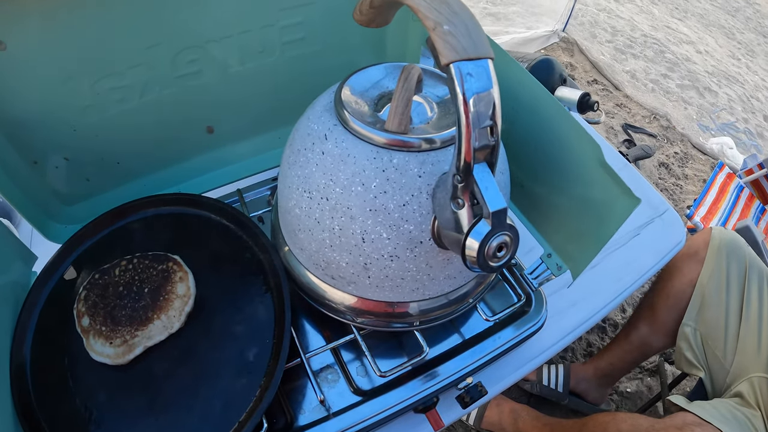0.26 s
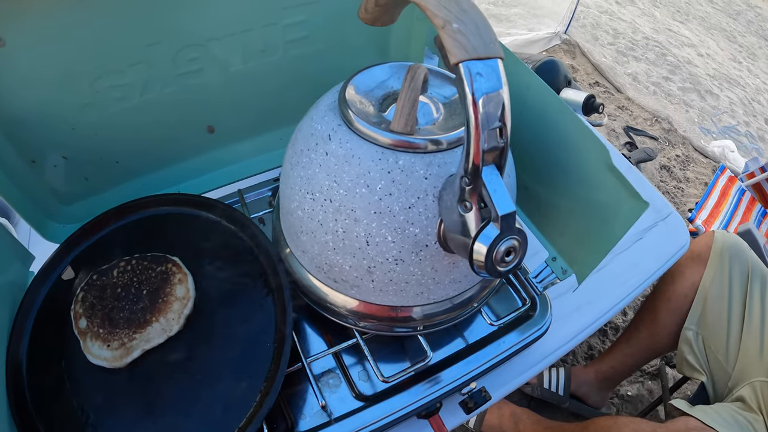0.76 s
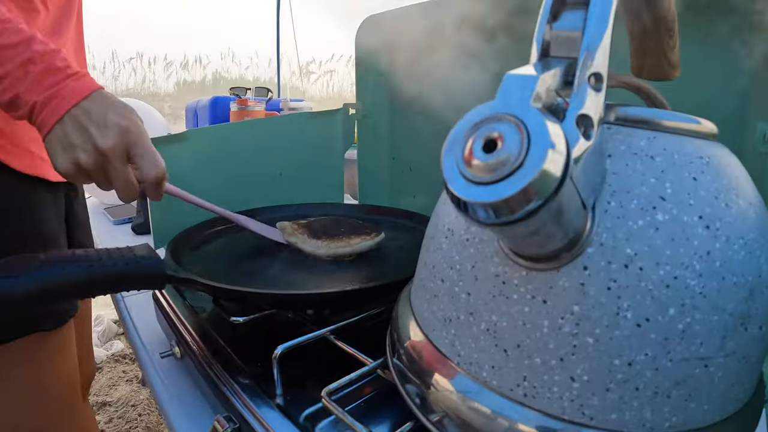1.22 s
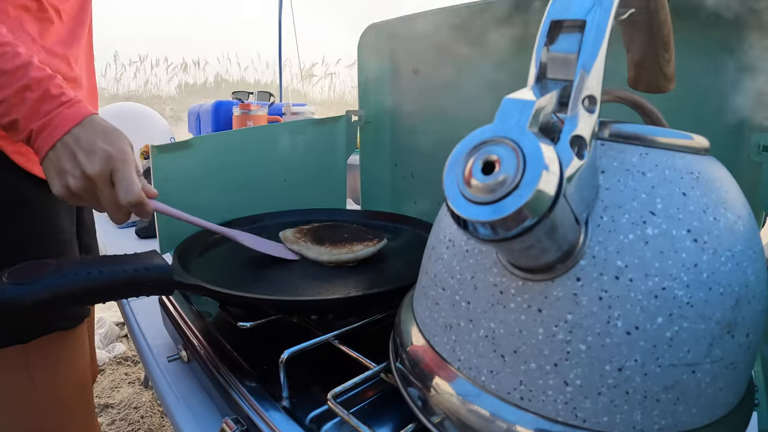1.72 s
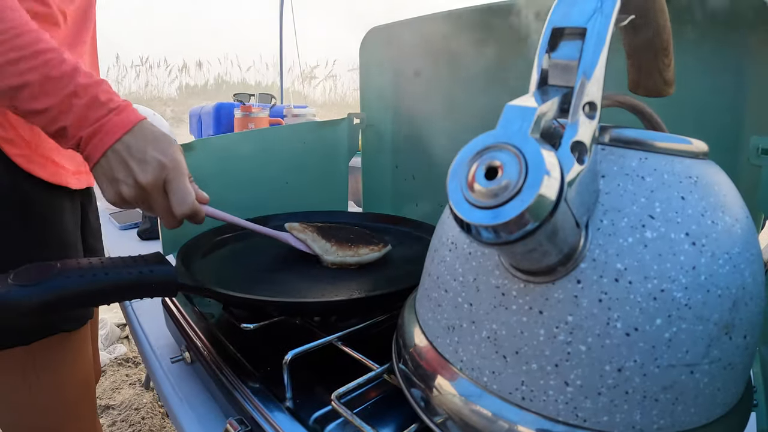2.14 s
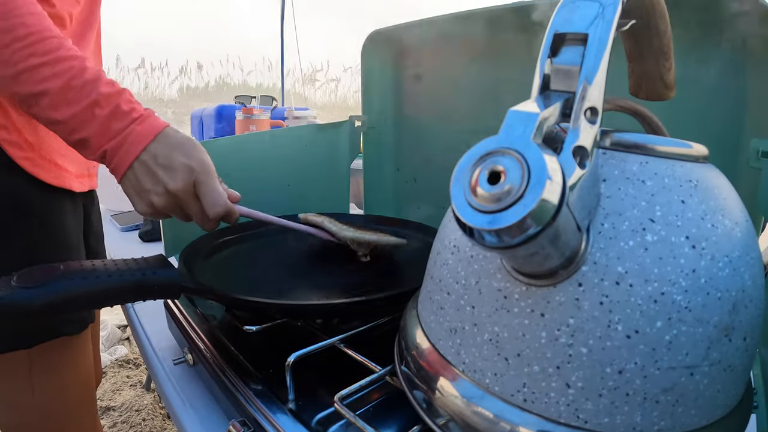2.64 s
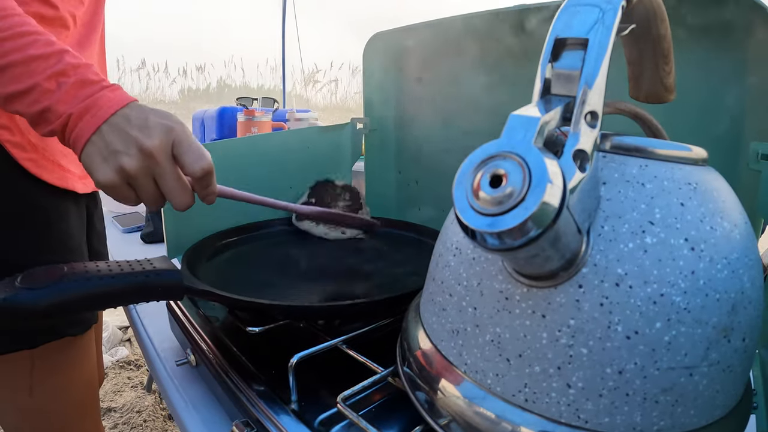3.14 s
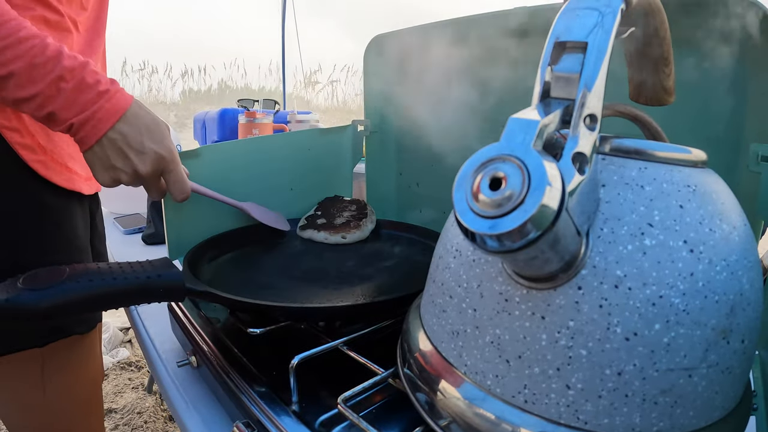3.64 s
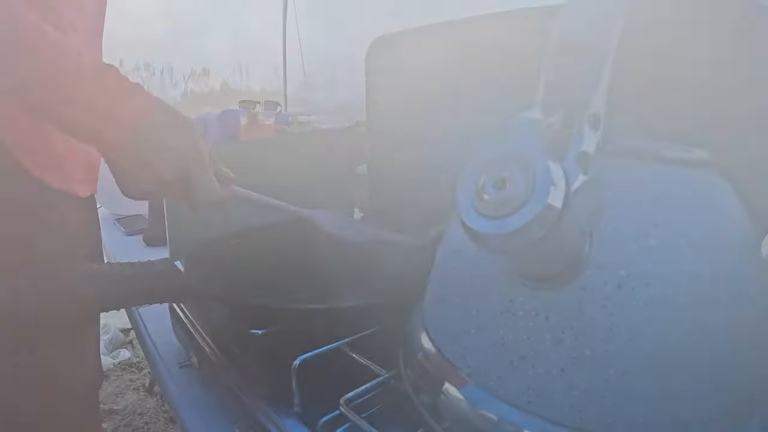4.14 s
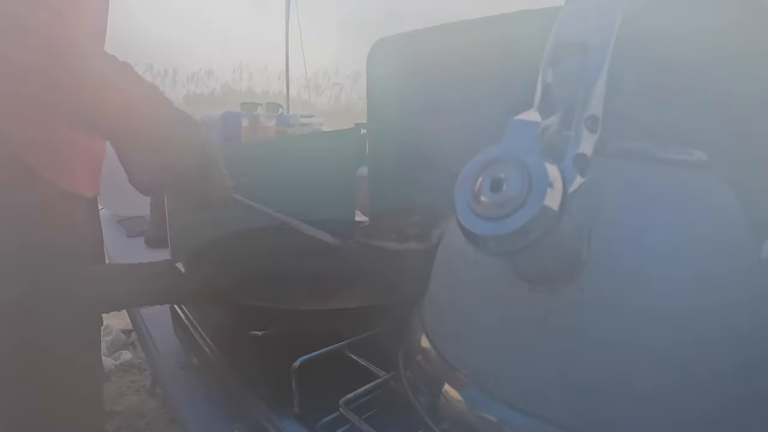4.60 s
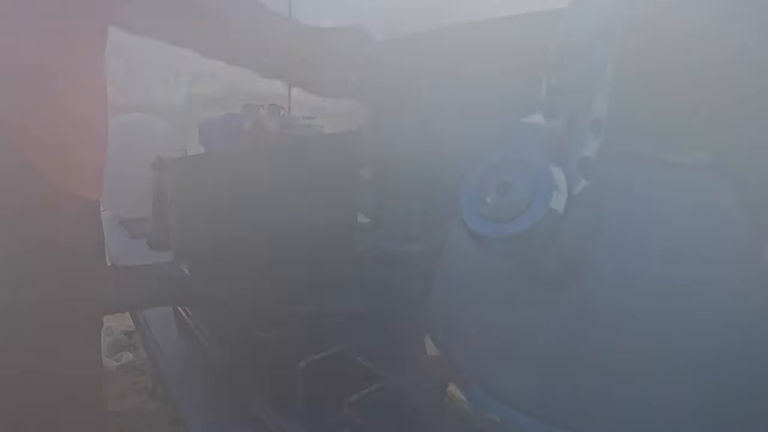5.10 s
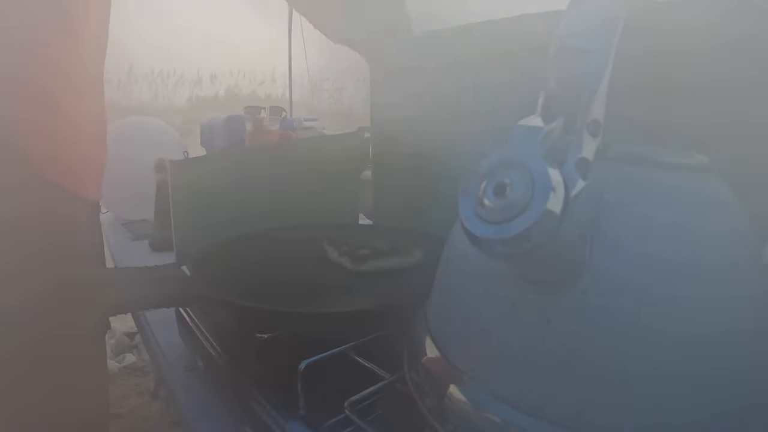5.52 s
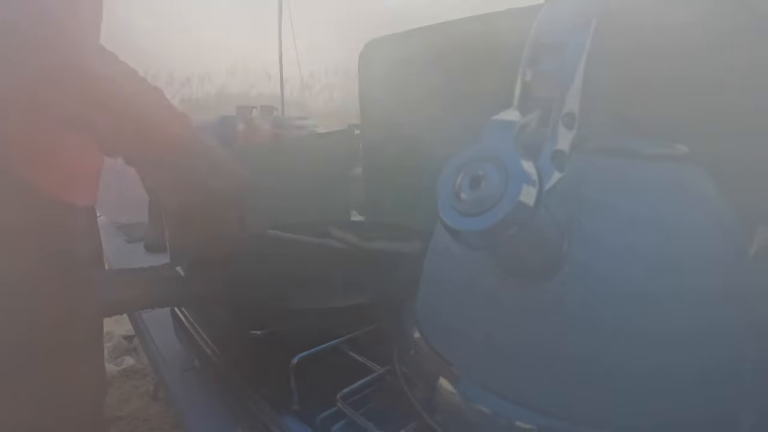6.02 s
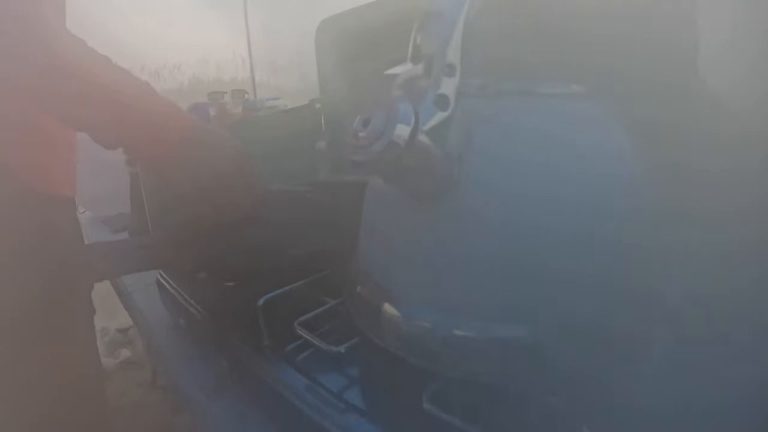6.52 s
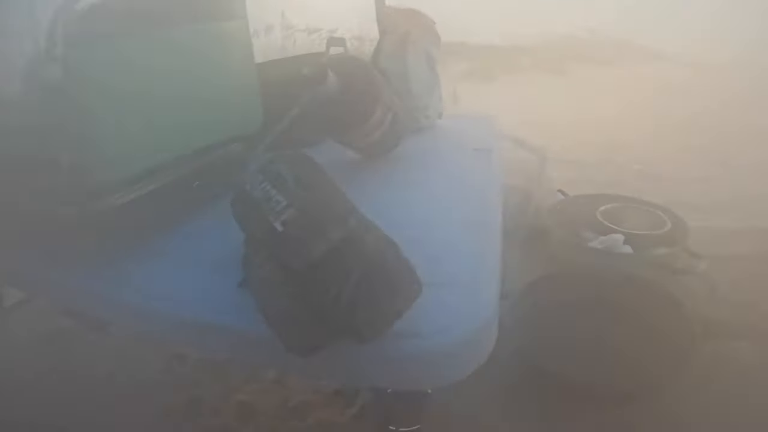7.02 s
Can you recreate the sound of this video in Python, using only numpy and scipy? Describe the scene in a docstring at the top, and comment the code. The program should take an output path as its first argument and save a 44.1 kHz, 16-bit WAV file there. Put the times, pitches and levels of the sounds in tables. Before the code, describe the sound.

Close outdoors at a gas camp stove, steam blows through a kettle spout with a husky, sputtering hollow note over a low roar and soft breeze. After a tiny silence a very shrill whistle cuts in, breaks down to a lower, fuller pitch, and climbs shakily with hissing steam. At the end the hiss fades, the roar rises and the whistle slides left.

```python
"""Kettle whistling on a camp stove

A kettle boils on a gas camp stove outdoors, heard from close by. At first steam only blows through the spout:
noise shaped by air resonances, over the rumble of burner and water and a light breeze. Then, after a short
silent gap, the scene changes: the cap whistles, built from jittering sine partials with echoes and steam hiss:
a shrill mode first, then a lower one with overtones that climbs as the steam builds. Near the end the hiss
fades, the roar rises and the whistle moves to the left."""
import sys
import numpy as np
from scipy import signal
from scipy.fft import rfft, irfft
from scipy.io import wavfile
from scipy.ndimage import uniform_filter1d

SR = 44100
rng = np.random.default_rng(int(sys.argv[2]) if len(sys.argv) > 2 else 0)


def master_out(mix):
    """Clip the mix to full scale and print it as 16-bit PCM to the path in sys.argv[1]."""
    frames = np.transpose(np.atleast_2d(mix))
    ceiling = np.clip(frames, -1, 1)
    pcm = np.round(ceiling * 32767).astype(np.int16)
    wavfile.write(sys.argv[1], SR, pcm)


N = 319794
T = np.arange(N) / SR  # time of every sample in seconds
FREQS = np.fft.rfftfreq(N, 1 / SR)

MODE_JUMP_S = 1.784  # the whistle jumps from the shrill mode to the main one
# from this moment the steam fades and the roar rises
LATE_S, LATE_HISS_FADE_DB_PER_S, LATE_HOLLOW_FADE_DB_PER_S, LATE_ROAR_RISE_DB_PER_S = 6.73, 14.5, 13, 4.5


def amp(db):
    """Decibels to gain."""
    return 10 ** (np.asarray(db) / 20)


def curves(rows):
    """Each column of a table, joined by straight lines in time."""
    seconds, *columns = np.transpose(rows)
    return [np.interp(T, seconds, column) for column in columns]


def ramp(start, length):
    """Rises from 0 to 1, both times in seconds."""
    return np.clip((T - start) / length, 0, 1)


def since(start):
    """Seconds gone by after a moment, zero before it."""
    return np.maximum(T - start, 0)


def swells(rows):
    """Sum of smooth bumps, one for each row of time, half length and height."""
    return sum(height * np.exp(-((T - s) / half) ** 2) for s, half, height in rows)


def colour(points):
    """Gain at every frequency from a short spectrum."""
    hz, db = np.transpose(points)
    return amp(np.interp(np.log(FREQS + 1), np.log(hz), db))


def resonances(modes, skirt=1.5):
    """Gain at every frequency from a few air resonances; a larger skirt falls off faster at the sides."""
    power = 0
    for hz, width, db in modes:
        distance = (FREQS - hz) / (0.49 * width)
        power = power + amp(db) ** 2 / (1 + distance ** 2) ** skirt
    return np.sqrt(power)


def noise(gain, band=(0, SR)):
    """Coloured noise with rms 1 inside a band in Hz."""
    inside = (FREQS >= band[0]) & (FREQS <= band[1])
    coloured = irfft(rfft(rng.standard_normal(N)) * gain, N)
    return coloured / np.sqrt(np.mean(gain ** 2 * inside))


def wander(slow_hz, fast_hz, slope=0.9):
    """Random drift of rms 1, mostly between a slow and a fast rate."""
    above_slow = FREQS / (FREQS + slow_hz)
    below_fast = 1 / (1 + (FREQS / fast_hz) ** 4)
    return noise((FREQS + slow_hz) ** -slope * above_slow * below_fast)


def wide(gain, side_db, band=(0, SR)):
    """Stereo noise: a part shared by both sides plus a part of opposite sign at side_db."""
    shared = noise(gain, band)
    return shared + np.array([[1], [-1]]) * amp(side_db) * noise(gain, band)


def panned(z, db, lead=0):
    """Places a sound by its left-minus-right level and, if complex, the right side's phase lead in radians."""
    left_right = np.array([[.5], [-.5]])
    sides = amp(left_right * db)
    return (z * sides / sides.mean(0) * np.exp(-1j * left_right * lead)).real


def steady(z):
    """Evens out the level of a complex tone over about 54 ms."""
    return z / np.sqrt(uniform_filter1d(abs(z) ** 2, size=2400) + 1e-12)


def partial(hz, db, scatter_db, decay=0.0073):
    """One complex partial plus echoes off the stove's wind shields, which turn pitch jitter into flutter."""
    tone = np.exp(2j * np.pi * np.cumsum(hz) / SR)
    t = T[:SR // 20]
    # a dense random burst of echoes that builds up, then dies away (decay in seconds)
    taps = rng.standard_normal(len(t)) * np.exp(-t / decay) * (1 - np.exp(-(t / decay) ** 2))
    echoes = signal.oaconvolve(tone, taps)[:N]
    # the flutter is deepest where the direct sound is weak
    echo_share = np.minimum(amp(scatter_db - db), 1)
    heard = steady(tone + echo_share * steady(echoes))
    return np.sqrt(2) * amp(db) * heard


# Colours of the roar, the breeze and the thin high hiss.
# Each row: frequency in Hz, relative level in dB per Hz.
ROAR_COLOUR = [(15, -25), (40, -8), (80, -0.5), (130, -1), (165, -3.5), (210, -4), (300, -8.5), (400, -13),
               (520, -21), (750, -30), (1200, -33), (3000, -62.5)]
BREEZE_COLOUR = [(5, -9), (20, -2.5), (45, 1), (80, 0.5), (130, -6.5), (300, -36.5), (1000, -84)]
AIR_COLOUR = [(9000, -24), (11200, -17.5), (12000, 4.5), (12700, -10), (15000, -16.5)]
# Gusts of the breeze. Each row: time in seconds, half length in seconds, lift in dB.
GUSTS = [(.3, 0.52, 8), (1.42, 0.25, 9), (3.3, .2, 2), (3.85, 0.13, 3.5), (4.32, 0.047, 8),
         (5.23, .085, 12), (6.15, .15, 6), (7.15, 0.22, 3)]
# the roar is loud at first and settles as the whistle takes over
ROAR_DB, SETTLED_ROAR_DB, SETTLE_START_S, SETTLE_LENGTH_S = -31, -42.5, 0.87, 1.24
BREEZE_DB, AIR_DB, AIR_RISE_DB = -42.3, -69.5, 5.5


def stove():
    """Low roar of flame and rolling water, a thin high hiss and a light breeze, all coloured noise."""
    roar_db = ROAR_DB + (SETTLED_ROAR_DB - ROAR_DB) * ramp(SETTLE_START_S, SETTLE_LENGTH_S)
    roar_db = roar_db + LATE_ROAR_RISE_DB_PER_S * since(LATE_S)
    roar = amp(roar_db) * wide(colour(ROAR_COLOUR), side_db=-31.5, band=(130, 450))
    breeze = amp(BREEZE_DB + swells(GUSTS)) * wide(colour(BREEZE_COLOUR), side_db=-29)
    air_db = AIR_DB + AIR_RISE_DB * ramp(2.7, 0.9)
    air = amp(air_db) * wide(colour(AIR_COLOUR), side_db=4)
    return roar + breeze + panned(air, db=-1.5)


# Air resonances of kettle and spout while steam only blows.
# Each row: frequency in Hz, width scale in Hz, relative level in dB.
BLOW_MODES = [(1213, 39.6, -0.5), (1337, 140, -15.5), (1755, 156, -20), (3427, 117, -20), (4880, 77, -32),
              (5700, 140, -34), (7020, 160, -44)]
# Colour of the blowing hiss. Each row: frequency in Hz, relative level in dB per Hz.
BLOW_COLOUR = [(300, -28), (800, -12), (1400, 5.5), (2300, -8), (3000, -4.5), (4400, 4), (5500, -6.5),
               (7500, -9), (8300, -16), (9900, -15.5), (11400, -31), (12000, -24), (12700, -30),
               (15000, -47)]
BLOW_DB, BLOW_HISS_DB = -26, -43


def blowing():
    """Too weak to whistle yet, steam rings the spout with a husky, sputtering note."""
    note_db = BLOW_DB + 1.2 * (ramp(0, 0.63) - 0.5)  # swells slightly at the start
    note = amp(note_db) * noise(resonances(BLOW_MODES, skirt=1.36))
    hiss = amp(BLOW_HISS_DB) * wide(colour(BLOW_COLOUR), side_db=-9)
    sputter_db = 1.3 * wander(slow_hz=12, fast_hz=90, slope=.5)
    placed = panned(signal.hilbert(note), db=1.0, lead=0.66)
    return (placed + hiss) * amp(sputter_db)


# Colours of the jet: under the shrill mode, then early and late under the main mode.
# Each row: frequency in Hz, relative level in dB per Hz.
SHRILL_JET_COLOUR = [(300, -14), (700, 12), (1500, 7), (2000, 17.5), (2350, 15.5), (2750, 5), (3600, 17),
                     (4300, 28.5), (5200, 8), (6300, 9), (6900, -1), (8200, 17), (9000, -18), (15000, -41)]
EARLY_JET_COLOUR = [(300, -24), (700, -8), (1500, -7.5), (2500, 2), (3950, -4), (4400, 7.5), (5200, 7.5),
                    (6050, -10.5), (6600, -2), (7400, -1), (8500, -8.5), (10300, -13.5), (11300, -35),
                    (12400, -20), (15300, -36)]
LATE_JET_COLOUR = [(300, -19.5), (700, -10.5), (1500, -8), (2100, -5.5), (2500, 4.5), (3950, -3.5),
                   (4600, 4), (5400, 8.5), (6500, -0.5), (8300, -7.5), (10300, -13), (11100, -24.5),
                   (12100, -20), (15300, -34.5)]
# Kettle resonances that lift bands of the hiss. Each row: frequency in Hz, width scale in Hz, lift in dB.
HISS_BANDS = [(2345, 220, 2), (3376, 260, 5.5), (4510, 150, 3), (4900, 140, 3.5), (7160, 260, 4),
              (7800, 200, 5.5), (9500, 320, 1), (10200, 250, 2.5)]
# Air resonances of the spout. Each row: frequency in Hz, width scale in Hz, relative level in dB.
SPOUT_MODES = [(1237, 37, 1.5), (1320, 138, -11.5), (1825, 133, -14.5)]
# Drift of the whistle between the ears; the hiss follows part of it.
# Each row: time in seconds, first partial's left-minus-right level in dB, the same for the second partial
# in dB, phase lead of the right side in radians.
PAN = [(3.6, 0, 0, 0), (3.7, 0, 1, 0.053), (4.45, -.6, 3.5, 0.28), (4.65, -0.5, -8, 0.4),
       (5.3, -1.7, -13, 0.42), (5.55, -2, -5.5, 0.56), (6.2, -2.5, -3, 0.47), (6.7, -2, -0.5, 0.58),
       (7.0, 5.5, 4, 0.23), (7.25, 11, 9, -0.27)]
# hiss of the jet and hollow note of the spout, under the shrill mode and at the start of the main one
SHRILL_HISS_DB, HISS_DB, SHRILL_HOLLOW_DB, HOLLOW_DB = -56.5, -44, -33.5, -40
HISS_FADE_DB_PER_S = 0.29


def steam():
    """The jet hisses and sounds the hollow of the spout, all of it sputtering together."""
    band = (6300, 7200)  # Hz, where the hiss levels apply
    lift_db = 0
    for hz, width, db in HISS_BANDS:
        lift_db = lift_db + db * np.exp(-((FREQS - hz) / (0.48 * width)) ** 2)
    lift = amp(lift_db)
    jumped = ramp(MODE_JUMP_S - .002, 0.0062)
    full = ramp(3.7, 1.0)  # the hiss broadens at full boil

    hiss_db = SHRILL_HISS_DB + (HISS_DB - SHRILL_HISS_DB) * jumped
    hiss_db = hiss_db - HISS_FADE_DB_PER_S * since(MODE_JUMP_S)
    hiss_db = hiss_db - LATE_HISS_FADE_DB_PER_S * since(LATE_S)
    hollow_db = SHRILL_HOLLOW_DB + (HOLLOW_DB - SHRILL_HOLLOW_DB) * ramp(1.57, 0.25)
    hollow_db = hollow_db - LATE_HOLLOW_FADE_DB_PER_S * since(LATE_S)

    # equal-power crossfades between the three colours
    jet = np.sqrt(1 - jumped) * noise(colour(SHRILL_JET_COLOUR), band)
    jet = jet + np.sqrt(jumped * (1 - full)) * noise(lift * colour(EARLY_JET_COLOUR), band)
    jet = jet + np.sqrt(full) * wide(lift * colour(LATE_JET_COLOUR), side_db=-25, band=band)
    jet = panned(jet, 0.78 * curves(PAN)[0])
    hollow = noise(resonances(SPOUT_MODES))
    sputter_db = 0.99 * wander(slow_hz=5.5, fast_hz=120, slope=1.0)
    return (jet * amp(hiss_db) + hollow * amp(hollow_db)) * amp(sputter_db)


# Surges and lulls of steam pressure bend whichever mode is sounding.
# Each row: time in seconds, half length in seconds, pitch change in Hz.
SURGES = [(1.218, .012, 104), (1.345, 0.021, -44), (1.377, 0.0088, 86), (1.567, .014, -59.5),
          (1.655, 0.027, -35.5), (1.745, 0.048, 59.5), (1.825, .02, 38), (1.881, 0.01806, -47.5),
          (2.072, 0.01214, 44.5), (2.705, .069, 40.5), (3.17, 0.071, 42.5), (3.373, 0.082, -110),
          (4.1, .015, 40), (4.224, 0.093, -100), (4.366, .072, -71), (4.674, .1, 42), (4.88, 0.024, -30),
          (5.567, 0.022, 49), (5.708, .029, -64), (6.25, .11, 60.5), (6.57, 0.051, -40.5),
          (6.78, .17, -95.5), (7.132, 0.14, 66)]
# The fundamental of either mode drops away for an instant.
# Each row: time in seconds, half length in seconds, level change in dB.
DIPS = [(1.725, 0.0042, -6), (2.655, .016, -5), (2.73, 0.018, -5), (3.27, .04, -2.5), (3.52, 0.068, -3.5),
        (4.24, 0.023, -6.5), (5.71, .025, -2), (6.95, .03, -4.5), (7.175, 0.039, -8.5)]
# centre pitch, and levels of the fundamental and its octave
SHRILL_HZ, SHRILL_DB, SHRILL_OCTAVE_DB = 4010, -18, -34.5


def shrill_whistle():
    """The upper mode of the cap; the lower mode stirs beneath it, mixes with it and finally takes over."""
    first_db = SHRILL_DB + swells(DIPS)
    second_db = SHRILL_OCTAVE_DB + 1.7 * wander(slow_hz=8, fast_hz=40, slope=.5)
    hz = SHRILL_HZ + swells(SURGES) + 27 * wander(slow_hz=14, fast_hz=300, slope=.8)
    # level flutter in dB just before the break
    faltering_db = ramp(1.67, .05) * 2.5 * wander(slow_hz=40, fast_hz=90)
    tone = partial(hz, first_db, scatter_db=-37.5) + partial(2 * hz, second_db, scatter_db=-39.5)
    tone = amp(faltering_db) * tone
    # faint partials at 3, 3/2 and 5/2 times the pitch
    tone += partial(3 * hz, first_db - 62, scatter_db=-74)
    tone += partial(3 * hz / 2, first_db - 36.0, scatter_db=-56)
    tone += partial(5 * hz / 2, first_db - 51, scatter_db=-68)

    lower_hz = 2340 + 25 * wander(slow_hz=30, fast_hz=200, slope=.7)
    lower_db = -49 + 21 * ramp(1.67, MODE_JUMP_S - 1.68) ** 2
    tone += partial(lower_hz, lower_db, scatter_db=-49)
    # sum and difference tones of the two modes
    for mixed_hz, db in [(hz + lower_hz, -9), (hz - lower_hz, -9), (2 * hz - lower_hz, -12)]:
        tone += partial(mixed_hz, lower_db + db, scatter_db=-56)
    return tone.real * (1 - ramp(MODE_JUMP_S - .005, 0.012))


# Levels of the main mode's partials at the listener.
# Each row: time in seconds, first partial in dB, second partial in dB, third partial in dB.
PARTIALS = [(1.8, -18.5, -21, -36.5), (2.05, -18, -24.5, -38), (2.58, -17.5, -22, -39.5),
            (2.68, -20.5, -19.7, -37), (2.85, -23.5, -21.5, -37.5), (3.35, -18.5, -20.5, -36.5),
            (3.55, -18, -21, -35.5), (3.75, -17.3, -24, -37.7), (4.33, -18.5, -25.5, -40.5),
            (4.5, -15.2, -29.5, -43.5), (4.6, -16, -34, -49), (5.4, -16.5, -33.5, -49.5),
            (5.8, -17, -26, -46), (6.1, -16.6, -29, -45.2), (6.5, -18, -24, -43.7),
            (6.8, -23, -20.5, -41.5), (7.1, -29.5, -25.5, -43.5), (7.25, -28, -29, -46)]
# the main mode climbs with the steam until full boil, then only creeps
FULL_BOIL_S, START_HZ, CLIMB_HZ_PER_S, CREEP_HZ_PER_S = 4.5, 2498, 128.6, 24.3
# rms shaking of the pitch: slow from bubbling, fast from turbulence, which calms towards full boil
BUBBLING_HZ, EARLY_JITTER_HZ, LATE_JITTER_HZ = 14.5, 18, 13.5
# a breathy strand of hiss below the octave: distance, rms blur of its pitch, level
STRAND_BELOW_HZ, STRAND_BLUR_HZ, STRAND_DB = 590, 65, -39.5


def main_whistle():
    """Vortices between the cap's two holes lock to its lower mode; the boil and turbulence shake the pitch."""
    first_db, second_db, third_db = curves(PARTIALS)
    first_db = first_db + swells(DIPS)
    # both partials waver more when weak
    first_waver_db = np.minimum(0.39 * amp(-16 - first_db), 2.1)
    first_db = first_db + first_waver_db * wander(slow_hz=6, fast_hz=100, slope=.6)
    second_waver_db = np.minimum(0.62 * amp(-20 - second_db), 1.3)
    second_db = second_db + second_waver_db * wander(slow_hz=3.4, fast_hz=100, slope=0.8)

    climb_hz = CLIMB_HZ_PER_S * (since(MODE_JUMP_S) - since(FULL_BOIL_S))
    climb_hz = climb_hz + CREEP_HZ_PER_S * since(FULL_BOIL_S)
    bubbling_hz = BUBBLING_HZ * wander(slow_hz=9, fast_hz=40, slope=.75)
    jitter_depth_hz = np.interp(T, [3.5, FULL_BOIL_S], [EARLY_JITTER_HZ, LATE_JITTER_HZ])
    jitter_hz = jitter_depth_hz * wander(slow_hz=30, fast_hz=320, slope=.75)
    hz = START_HZ + climb_hz + swells(SURGES) + bubbling_hz + jitter_hz
    hz = hz - 125 * np.exp(-since(MODE_JUMP_S) / 0.00897)  # the new mode starts flat and pulls in

    first_pan, second_pan, lead = curves(PAN)
    first = panned(partial(hz, first_db, scatter_db=-34, decay=0.0045), first_pan, lead)
    second = panned(partial(2 * hz, second_db, scatter_db=-37.0, decay=0.0031), second_pan, lead)
    upper = partial(3 * hz, third_db, scatter_db=-45, decay=0.0024)
    upper += partial(4 * hz, third_db - 22, scatter_db=-67, decay=.003)
    blur_hz = STRAND_BLUR_HZ * wander(slow_hz=60, fast_hz=400, slope=.5)
    strand_hz = 2 * hz - STRAND_BELOW_HZ + blur_hz
    strand_db = STRAND_DB - LATE_HISS_FADE_DB_PER_S * since(LATE_S)
    upper += partial(strand_hz, strand_db, scatter_db=-36, decay=.002)
    whistle = first + second + panned(upper, first_pan, lead)
    return whistle * ramp(MODE_JUMP_S - .003, 0.0036)


# The silent gap between the two scenes: its start in seconds, its end in seconds.
SILENCE = (1.013, 1.095)


def scene():
    """Two scenes one after the other, with a short silent gap between: the husky kettle, then the whistling
    kettle, which fades in."""
    before = 1 - ramp(SILENCE[0] - .003, 0.0054)
    after = ramp(SILENCE[1], 0.05)
    whistling = stove_free = steam() + shrill_whistle() + main_whistle()
    return (before + after) * stove() + before * blowing() + after * whistling


EDGE_HZ = 15700


def record(dry):
    """The band limit of the recorder: a low-pass filter that removes what lies above the edge."""
    lowpass = signal.firwin(511, EDGE_HZ, window=("kaiser", 9), fs=SR)
    return signal.oaconvolve(dry, lowpass[None], "same")


dry = scene()
out = record(dry)
master_out(out)
```